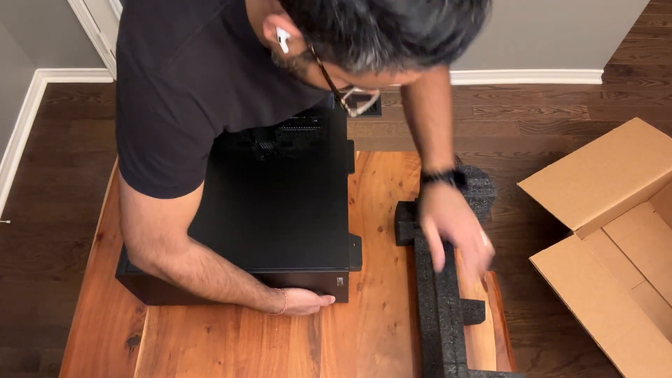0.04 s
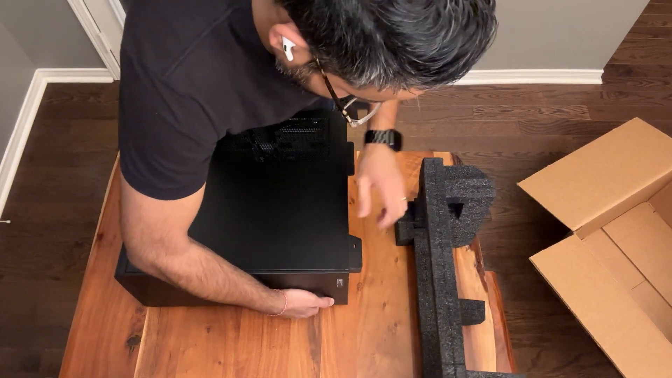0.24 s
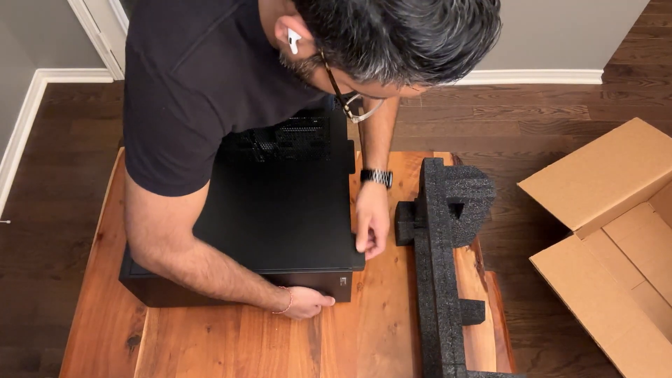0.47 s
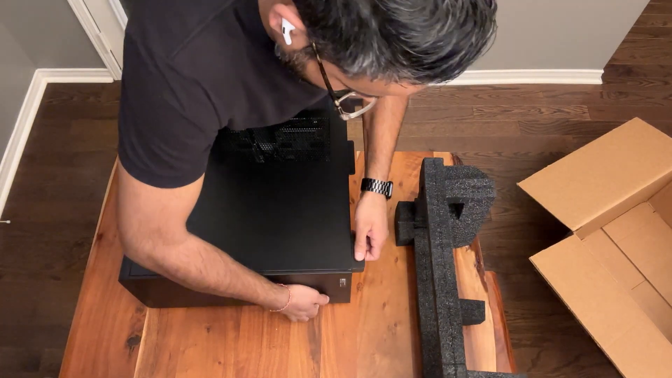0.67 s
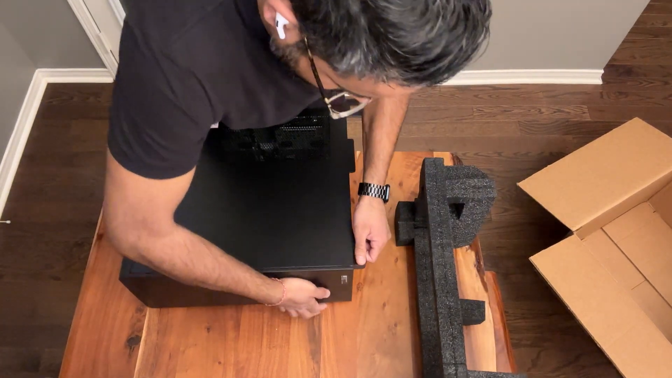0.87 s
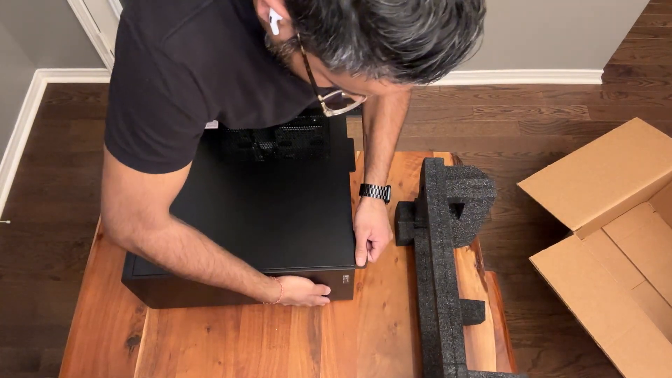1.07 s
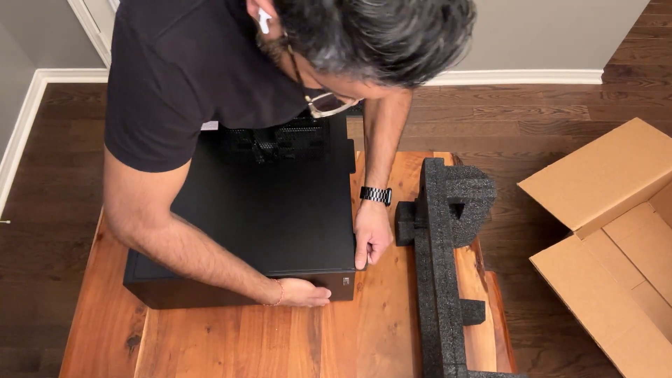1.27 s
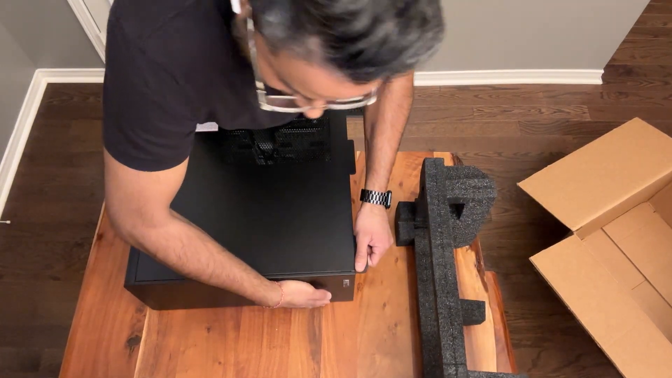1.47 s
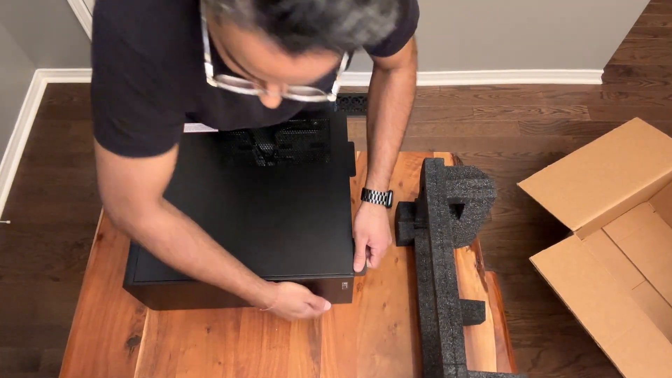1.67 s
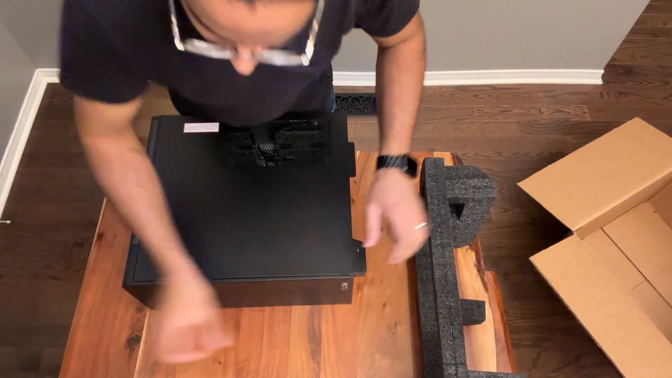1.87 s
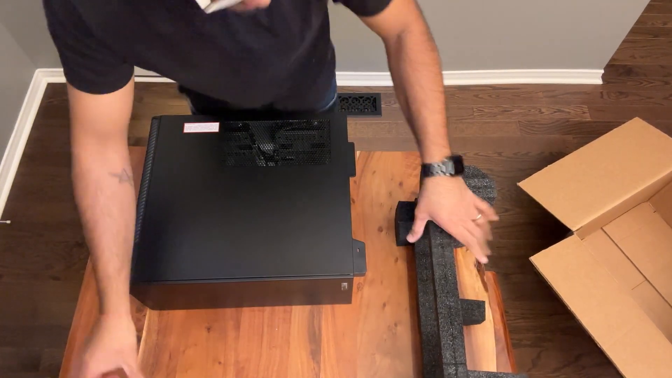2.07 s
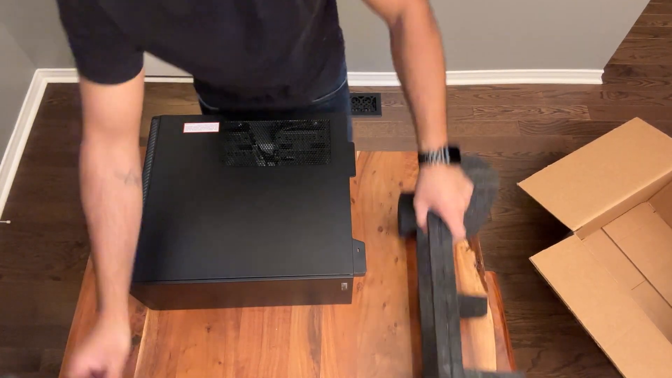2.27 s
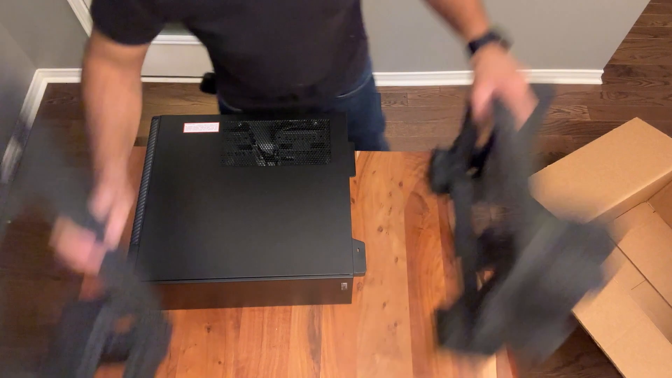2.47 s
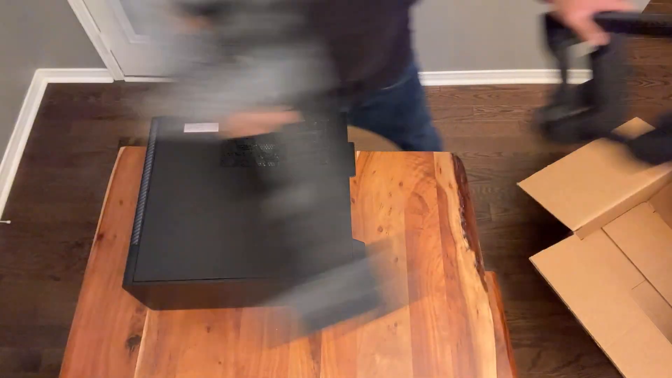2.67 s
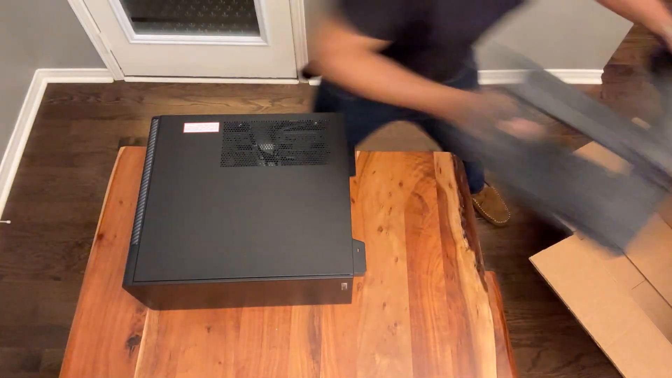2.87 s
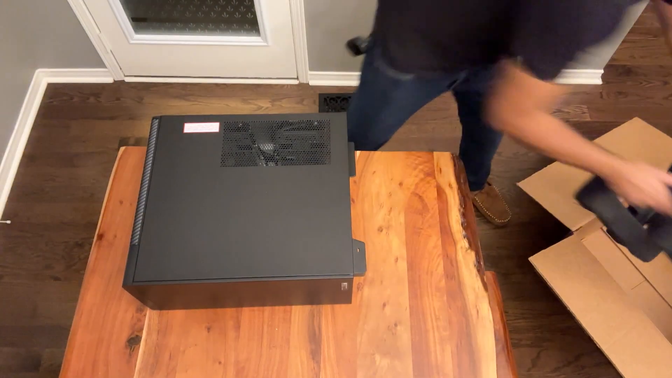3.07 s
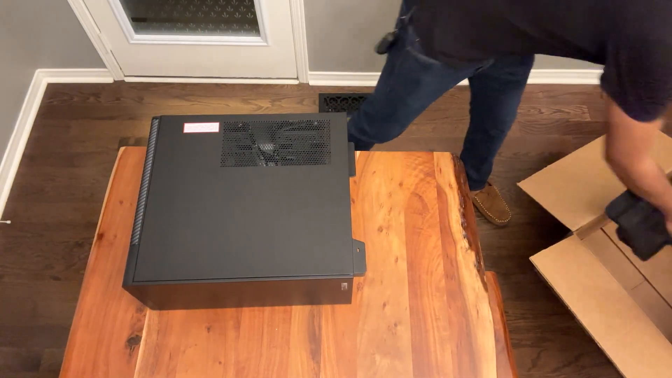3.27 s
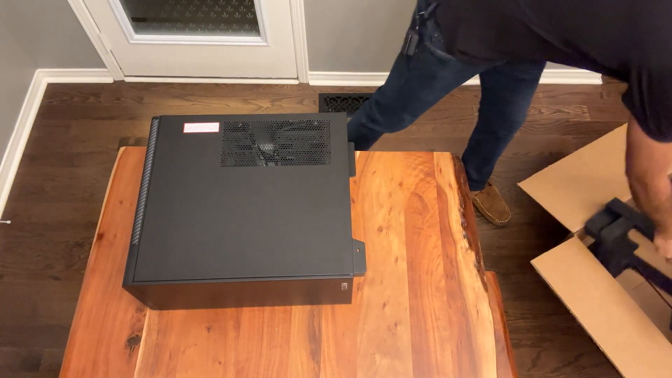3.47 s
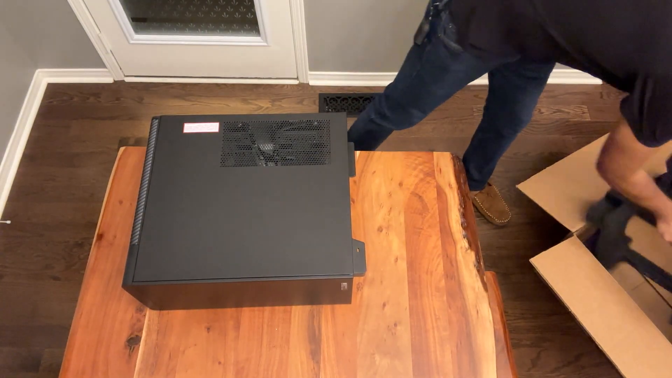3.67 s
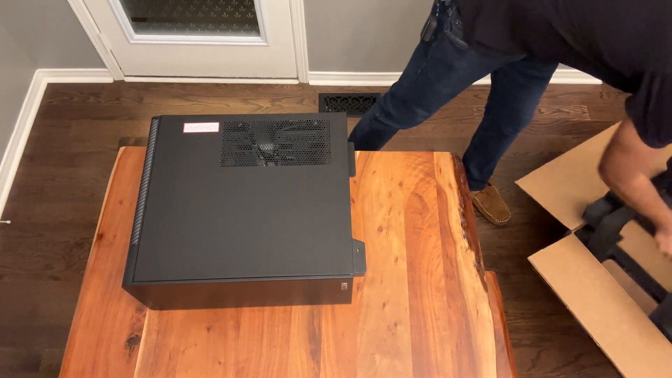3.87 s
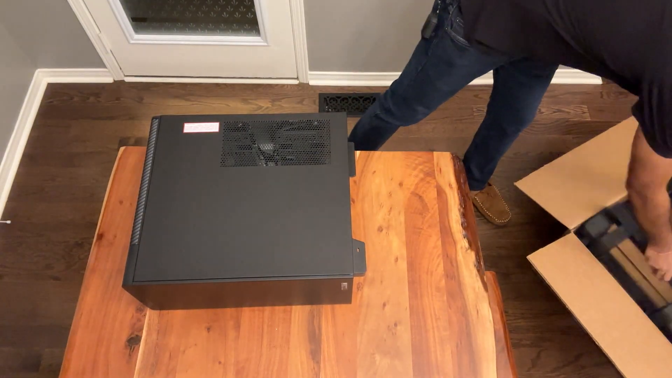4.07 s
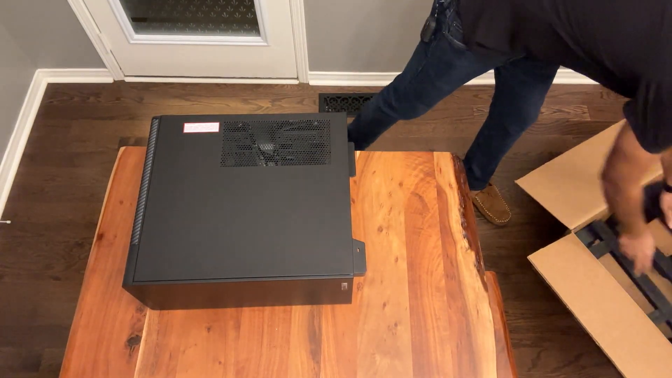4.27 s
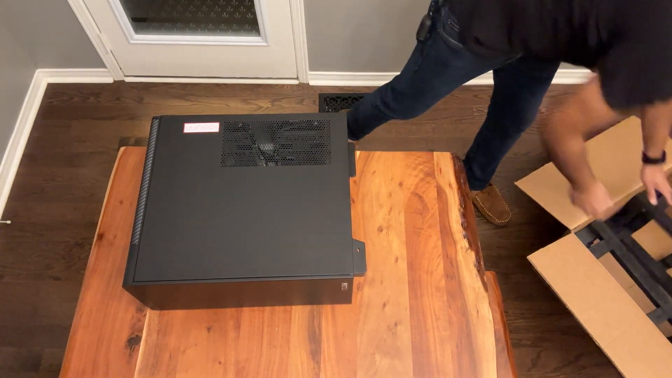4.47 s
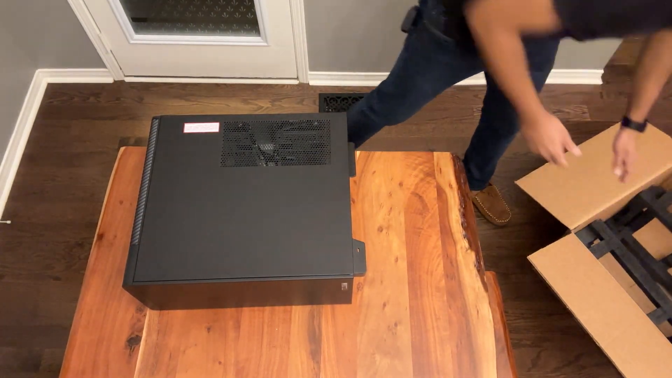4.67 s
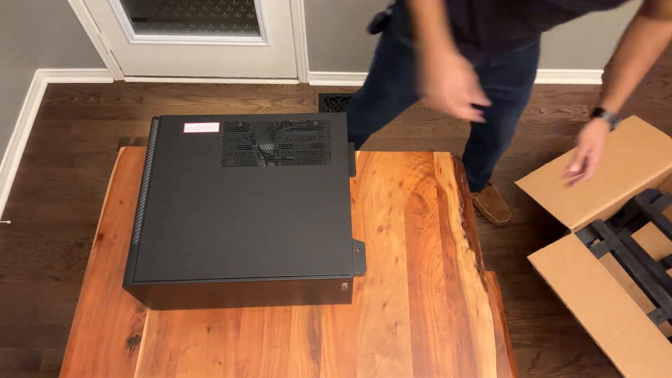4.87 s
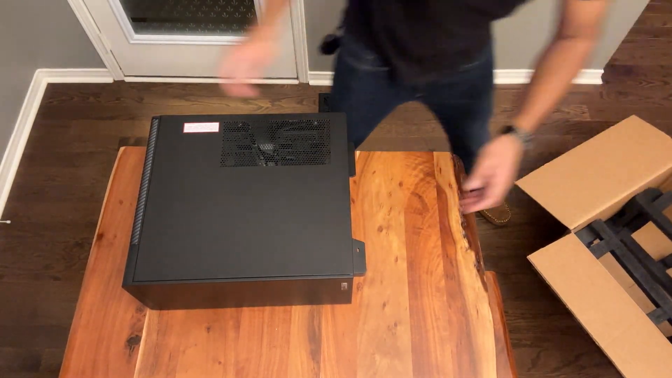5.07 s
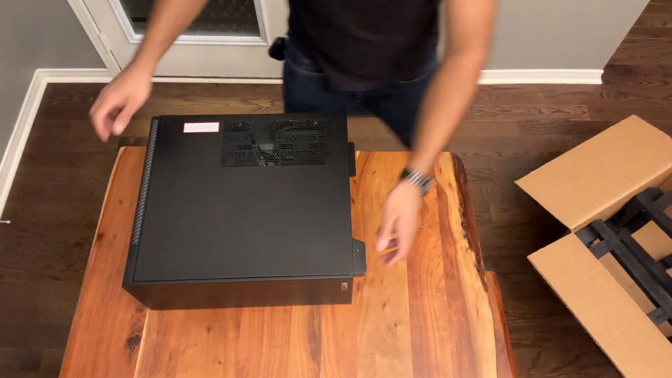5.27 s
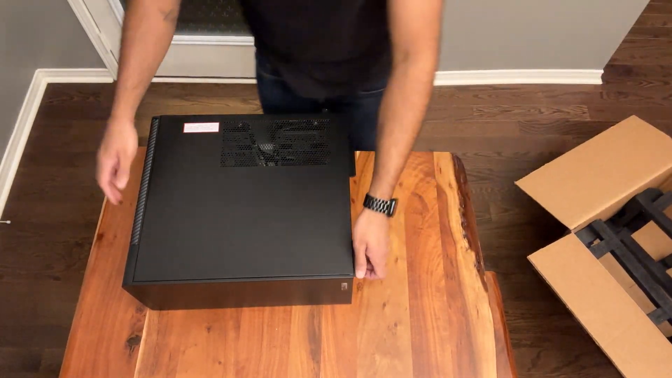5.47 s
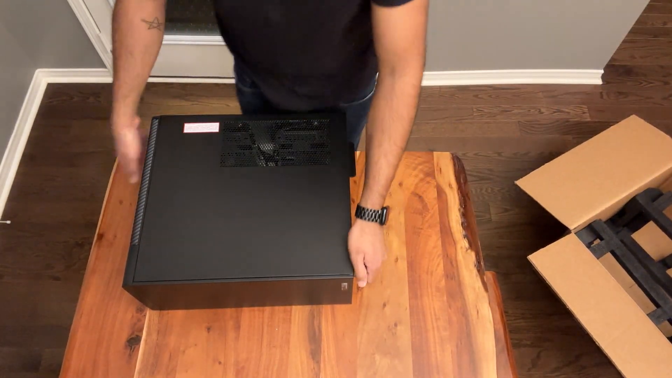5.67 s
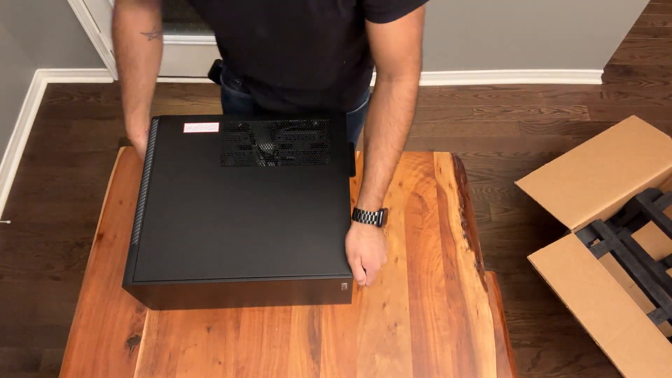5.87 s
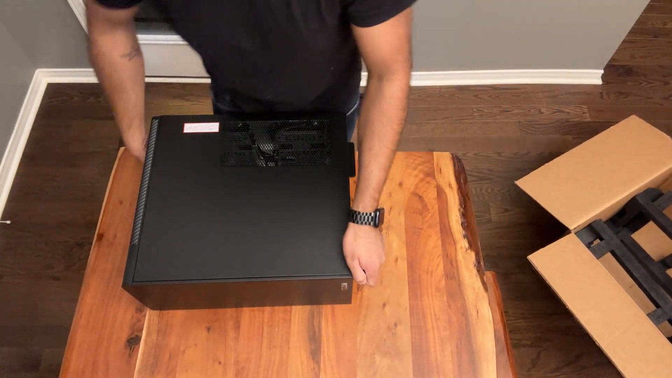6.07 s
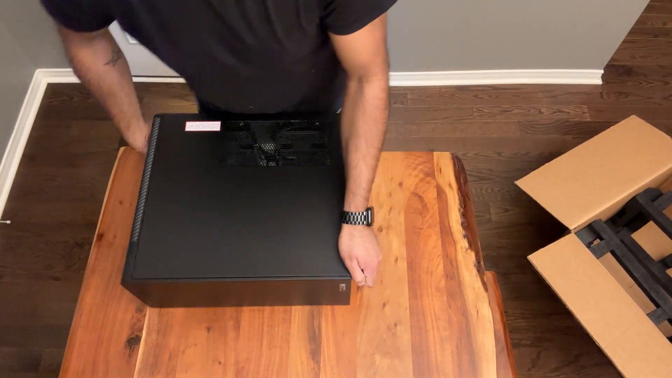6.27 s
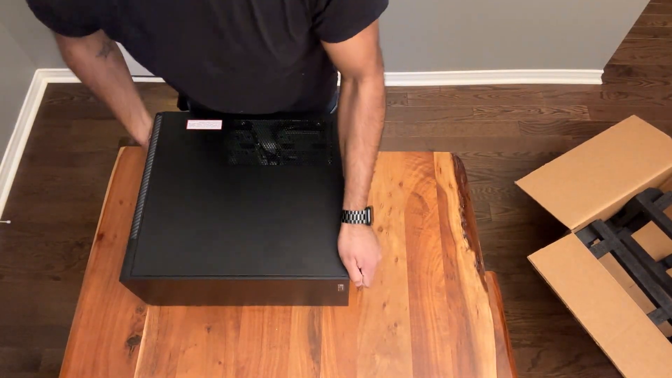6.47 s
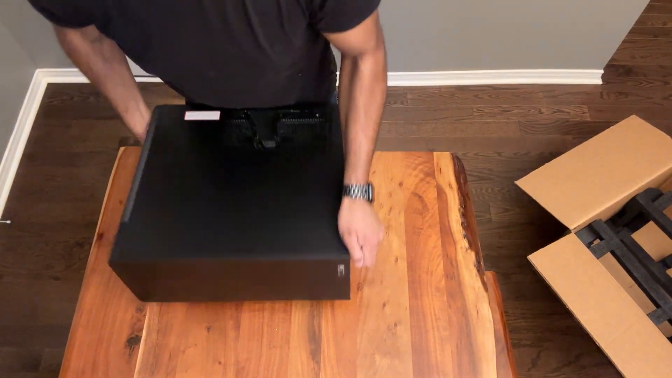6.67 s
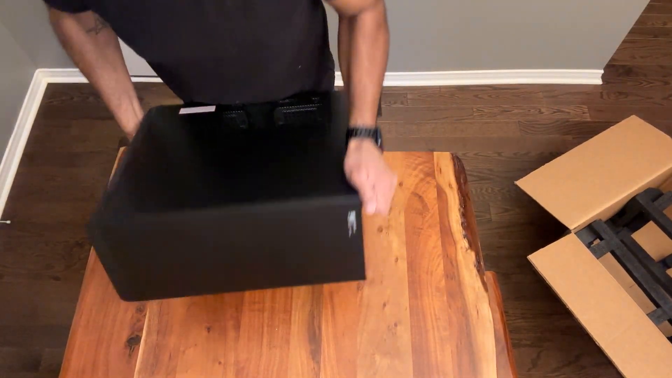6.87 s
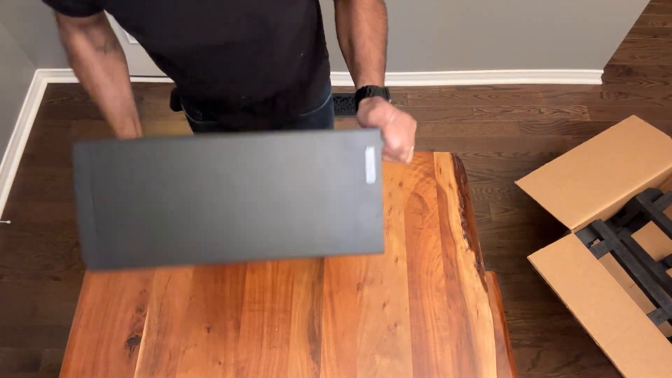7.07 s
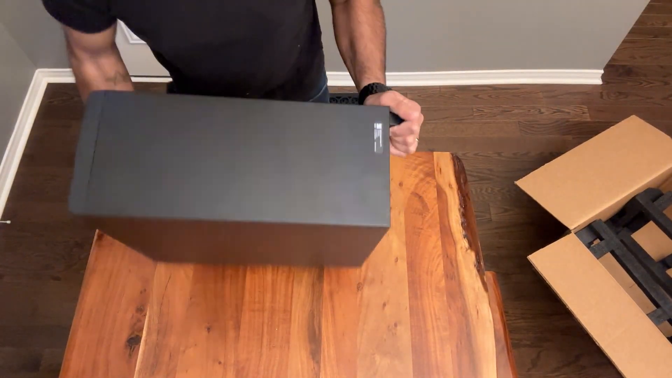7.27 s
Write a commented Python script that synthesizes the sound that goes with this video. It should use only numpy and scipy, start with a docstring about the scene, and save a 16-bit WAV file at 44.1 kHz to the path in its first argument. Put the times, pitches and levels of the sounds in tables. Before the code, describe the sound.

A bare room with a wooden floor, heard closely in stereo with a short lively reverberation and quiet air. At 0.2 s a palm bumps a hollow steel computer case, a low ringing thud; taps and brushes follow, a scrape with a small squeak around 0.9, then thuds at 1.1 and a softer 1.4. It is nearly quiet until foam is picked up with faint rasps from 2.1 to 2.7. At 2.85 a step and a foam knock. From 3.35 to 4.6, on the right, foam is forced into a cardboard box: dense coarse scrapes, sharp crackling rushes at 3.5 and 4.15, tiny squeaks near 3.7-3.9, hollow thumps at 3.7 and 3.9, and the loudest boom at 4.23, with the floor rumbling. Soft rustles, then light footsteps and taps from 5.05 to 6.0. Hands rub the case, knock it at 6.5-6.6, and very faint touches end the scene by 7.3.

```python
"""A bare room with a wooden floor: hands bump, brush and tap a steel computer case close to a microphone pair.
To the right, foam end caps are forced into a cardboard box: they scrape, rasp and thump its walls.
Blows are damped modes and filtered noise bursts; rubbing is a dense train of random little slips.
Squeaks are unsteady tones; steps and shifting weight sound the floor, over the quiet air of the room."""
import sys
import numpy as np
from scipy import signal
from scipy.fft import rfft, irfft, next_fast_len
from scipy.io import wavfile
from scipy.ndimage import uniform_filter1d, map_coordinates

SR = 44100
rng = np.random.default_rng(int(sys.argv[2]) if len(sys.argv) > 2 else 0)


def transcribe(signal):
    """Save signal, clipped to [-1, 1], as a 16-bit WAV file at the path in sys.argv[1]."""
    frames = np.atleast_2d(signal).T
    limited = np.clip(frames, -1, 1)
    pcm = np.round(limited * 32767).astype(np.int16)
    wavfile.write(sys.argv[1], SR, pcm)


N = 323485
TIME = np.arange(N) / SR
AGE = np.arange(SR) / SR  # seconds since a blow or the start of a stroke

# Tone of the low drag, for foam and hands alike. Each row: frequency in Hz, relative level in dB.
DRAG_TONE = [(150, -23.5), (260, 2), (400, 2), (700, -0.5), (1200, -8), (1800, -13.5), (4000, -67.5)]


def amp(db):
    """Decibels to gain."""
    return 10 ** (np.asarray(db) / 20)


def unit(x):
    """Scale to rms 1."""
    return x / np.sqrt(np.mean(x ** 2) + 1e-20)


def loudest(x):
    """Scale a stereo blow so that its loudest 20 ms have rms 1."""
    power = uniform_filter1d(np.mean(x ** 2, axis=0), size=882)
    return x / np.sqrt(power.max() + 1e-20)


def along(points, hz):
    """Read a curve of (Hz, value) points on a log frequency axis."""
    f, v = np.transpose(points)
    return np.interp(np.log(hz + 1), np.log(f), v)


def wobble(rate):
    """A smooth random curve with rate knots a second."""
    return map_coordinates(rng.standard_normal(size=4096), [TIME * rate], mode="wrap")


def colour(x, points):
    """Filter to the given (Hz, dB) shape with minimum phase, so that nothing sounds before the blow."""
    n = x.shape[-1]
    m = 2 * next_fast_len(n // 2 + SR // 8)
    shape_db = along(points, np.fft.rfftfreq(m, 1 / SR))
    cepstrum = irfft(np.log(amp(shape_db)))
    # Folding the cepstrum onto positive time makes the filter causal.
    cepstrum[1:m // 2] *= 2
    cepstrum[m // 2 + 1:] = 0
    return irfft(rfft(x, m) * np.exp(rfft(cepstrum)), m)[..., :n]


def add(track, s, x):
    """Mix x into the track at s seconds."""
    start = max(round(s * SR), 0)
    track[:, start:start + x.shape[-1]] += x[..., :N - start]


def echoes():
    """A fresh stereo room tail of energy 1: sparse wall echoes thicken into a wash; the top treble dies first."""
    # Reverberation of the room. Each row: frequency in Hz, t60 in seconds.
    room_t60 = [(60, 0.69), (250, 0.43), (700, 0.41), (2000, 0.53), (5000, 0.42), (10000, 0.39),
                (15000, 0.12)]
    density = np.clip((AGE / 0.06) ** 2, 1 / 400, 1)
    present = rng.random((2, SR)) < density
    arrivals = rng.standard_normal((2, SR)) * present / np.sqrt(density)
    hz, t, z = signal.stft(arrivals, SR, nperseg=256)
    decay = amp(-60 * t / along(room_t60, hz)[:, None])
    tail = signal.istft(z * decay, SR, nperseg=256)[1][:, :SR]
    onset = 1 - np.exp(-AGE / 0.0047)
    return unit(tail * onset) / np.sqrt(SR)


def contact(t60, wet_db):
    """A short rough contact of energy 1, the same at both microphones, and the room's answer."""
    crack = unit(rng.standard_normal(SR) * amp(-60 * AGE / t60)) / np.sqrt(SR)
    return crack + amp(wet_db) * echoes()


def ring(modes, rise, pitch=1, spread=0.3, waver=0.3):
    """Damped modes; reflections make each waver and reach the two microphones out of step."""
    out = np.zeros((2, SR))
    for hz, db, t60 in modes:
        drift = np.interp(AGE, np.linspace(0, 1, num=50), np.cumsum(rng.standard_normal(size=50)))
        offset = spread * hz / 200 * rng.standard_normal((2, 1))  # one per microphone
        phase = 2 * np.pi * hz * pitch * AGE + waver * drift + offset
        level = amp(db + rng.normal(0, 1) - 60 * AGE / t60)
        out += level * np.sin(phase)
    return loudest(out * (1 - np.exp(-(AGE / rise) ** 2)))


def patchy(x, depth_db):
    """Brief resonances come and go as the contact patch moves."""
    z = signal.stft(x, nperseg=512)[2]
    field = uniform_filter1d(rng.standard_normal(z.shape[1:]), size=3, axis=0)  # over frequency
    field = uniform_filter1d(field, size=5, axis=1)  # over time
    return signal.istft(z * amp(depth_db * unit(field)), nperseg=512)[1][:, :x.shape[-1]]


def strokes(rows, release):
    """A gain per sample for each dB column: a stroke swells over its length, then dies away with t60 release."""
    power = np.zeros((len(rows[0]) - 2, N))
    for s, length, *db in rows:
        swell = np.sin(np.pi / 2 * np.minimum(AGE / length, 1)) ** 0.92
        fade = amp(-60 * np.maximum(AGE - length, 0) / np.reshape(release, (-1, 1)))
        add(power, s, (amp(db)[:, None] * swell * fade) ** 2)
    return np.sqrt(power)


def friction(spectrum, rate, grain_db, wet_db, flutter_db):
    """Dense little slips of uneven size, rate a second on average, heard in the room, rms 1."""
    present = rng.random(N) < rate / SR
    size = amp(grain_db * np.minimum(rng.exponential(size=N), 4))
    slips = present * rng.standard_normal(N) * size
    answer = signal.fftconvolve(slips[None], echoes(), axes=1)[:, :N]
    heard = patchy(slips + amp(wet_db) * answer, depth_db=2.8)
    return unit(colour(heard, spectrum) * amp(flutter_db * wobble(70)))


def rubbing(rows, release, shapes, rate, grain_db, wet_db, flutter_db, groan_db):
    """Sliding contact: low drag, scrape and fine-textured hiss; the drag makes the hollow body groan."""
    # Tone of the groaning hollow body. Each row: frequency in Hz, relative level in dB.
    groan_tone = [(60, -34.5), (105, 1), (145, -3.5), (205, 2), (300, -18), (500, -55)]
    levels = strokes(rows, release)
    pressure = amp(0.85 * wobble(35))  # varies in fits, for all bands together
    slide = np.zeros((2, N))
    for level, shape in zip(levels, shapes):
        slide += level * friction(shape, rate, grain_db, wet_db, flutter_db)
    groan = levels[0] * amp(groan_db) * unit(colour(rng.standard_normal((2, N)), groan_tone))
    return pressure * slide + groan


def box():
    """Foam jams and gives way: one wall booms, the box rings and the cardboard buckles."""
    # Foam thumping the box. Each row: start in seconds, wall level in dB, wall pitch in Hz, ring level in dB,
    # crush level in dB, rise in seconds (the wall takes twice as long).
    thumps = [(3.363, -36.5, 250, -48.5, -48.5, 0.007), (3.716, -38, 853, -51.5, -40, 0.00062),
              (3.725, -28.5, 218.5, -30, -31, 0.0046), (3.768, -37, 105.7, -36.5, -39, 0.0051),
              (3.91, -34, 220, -31.5, -28, 0.0029), (4.233, -16.5, 175.7, -21.5, -17.5, 0.00078),
              (4.252, -33.5, 103.4, -46, -26, 0.0028), (4.414, -55, 188, -32.5, -26, 0.0019),
              (4.53, -42, 137.4, -51, -43, 0.0073)]
    # Modes of the cardboard box. Each row: frequency in Hz, relative level in dB, t60 in seconds.
    box_modes = [(55.66, 0.5, 1), (106.9, 5, 0.66), (203.5, 1.5, 0.75), (243.2, 8, 0.35), (398.4, 8, 0.4),
                 (451, -15.5, 0.28), (493, 3.5, 0.59), (560, -17.5, 0.09), (626, -14, 0.17), (756, -5, 0.1),
                 (788, 5, 0.19), (837, -27, .35)]
    # Tone of buckling cardboard. Each row: frequency in Hz, relative level in dB.
    crush_tone = [(25, -11.5), (55, -15.5), (120, -6), (220, 1.5), (310, -8), (420, -1), (600, -6.5),
                  (900, -13), (1250, -21.5), (2000, -28), (5000, -62.5)]
    out = np.zeros((2, N))
    for s, wall_db, wall_hz, ring_db, crush_db, rise in thumps:
        wall = ring([(wall_hz, 0, 0.3)], 2 * rise, spread=0.65, waver=0.13)
        whole = ring(box_modes, rise, spread=0.63, waver=0.96)
        buckle = colour(contact(t60=0.15, wet_db=0.5), crush_tone) * (1 - np.exp(-AGE / rise))
        add(out, s, amp(wall_db) * wall)
        add(out, s, amp(ring_db) * whole)
        add(out, s, amp(crush_db) * loudest(buckle))
    return out


def foam():
    """Foam caps are picked up, then shoved into the box: coarse slips, and the hollow box groans."""
    # Each row: start in seconds, length in seconds, drag level in dB, scrape level in dB, hiss level in dB.
    foam_strokes = [(2.11, 0.17, -55, -53.5, -57.5), (2.25, 0.013, -55.5, -51.5, -53),
                    (2.41, 0.083, -63, -56, -58.5), (2.52, 0.14, -74, -69, -67),
                    (2.66, 0.14, -69.5, -62.5, -63.5), (2.83, 0.09, -43, -57, -62),
                    (2.93, 0.095, -60, -58.5, -65), (3.08, 0.31, -75, -69, -72),
                    (3.365, 0.097, -42, -40.5, -48), (3.47, 0.025, -38.5, -55, -55),
                    (3.56, .13, -47.5, -39.5, -43.5), (3.72, 0.065, -41, -44, -53.5),
                    (3.915, 0.12, -41, -39, -43.5), (4.02, 0.098, -41, -38, -43),
                    (4.14, 0.11, -34.5, -32.5, -40.5), (4.25, 0.057, -32.5, -39.5, -44),
                    (4.38, 0.074, -36, -40, -46), (4.48, 0.024, -41, -54, -65.5)]
    # Tones of the scrape and the hiss. Each row: frequency in Hz, relative level in dB.
    scrape_tone = [(600, -35), (1150, -3.5), (2000, -2.5), (3200, -3.5), (4500, -5), (6000, -6),
                   (7500, -15.5), (10000, -39.5)]
    hiss_tone = [(4500, -43), (7000, -12), (8500, -0.5), (10000, -3.5), (11500, -7), (14000, -10.5),
                 (15500, -42.5)]
    release = (0.48, 0.55, 0.44)  # t60 in s of drag, scrape and hiss after letting go
    return rubbing(foam_strokes, release, (DRAG_TONE, scrape_tone, hiss_tone), rate=2200,
                   grain_db=2.5, wet_db=4, flutter_db=1.04, groan_db=-1.5)


def rasps():
    """Jammed foam lets go in a sudden crackling rush."""
    # Foam catching and breaking loose. Each row: start in seconds, level in dB, t60 in seconds,
    # treble tilt in dB reached at 8 kHz.
    rushes = [(2.845, -61, 0.87, -37.5), (3.35, -53, 0.073, -24.5), (3.374, -47, 0.22, -2.5),
              (3.487, -31.5, 0.085, 3.5), (3.817, -45.5, 0.045, 4), (3.892, -40, 0.24, -5.5),
              (4.162, -34.5, 0.51, 3), (4.386, -35, 0.4, 6.5)]
    rasp_tone = [(600, -18), (1800, -10.0), (3200, 0.5), (5500, -3.5), (7500, -7.0), (10000, -5.0),
                 (12000, -11.0), (15000, -10.0)]  # (Hz, dB)
    out = np.zeros((2, N))
    for s, db, t60, tilt_db in rushes:
        rush = patchy(contact(t60, wet_db=1.5), depth_db=4)
        rush = colour(rush, rasp_tone)
        rush = colour(rush, [(1500, 0), (8000, tilt_db)])
        add(out, s, amp(db) * loudest(rush))
    return out


def from_right(x, shade_db):
    """The box stands to the right: its sound reaches the left microphone later and weaker."""
    left = amp(-shade_db) * np.roll(x[0], 13)  # 13 samples, about 0.3 ms
    return np.array([left, amp(shade_db) * x[1]])


def case():
    """A bump rings the side panel and rattles it faintly; a slow press reaches only the low modes."""
    # Bumps on the case. Each row: start in seconds, panel level in dB, thud level in dB, rattle level in dB,
    # panel pitch ratio, rise in seconds.
    bumps = [(.232, -29, -31.5, -59, 1, 0.01), (1.099, -29.5, -29, -67.5, 0.98, 0.0028),
             (1.381, -32.5, -36, -57.5, .94, 0.0089), (6.529, -47, -53, -73, 1.03, 0.024),
             (6.87, -58, -71, -90, 1.03, 0.011), (7.022, -58, -65, -94, 1.2, 0.0059),
             (7.11, -61, -68, -77, 1.03, .008), (7.215, -58.5, -62, -84, 1.07, .009)]
    # Modes of the steel side panel. Each row: frequency in Hz, relative level in dB, t60 in seconds.
    panel_modes = [(52.5, -11, 0.96), (84.6, -11, 0.68), (181.4, 6, 0.45), (227, -21, 0.4),
                   (279, 3.5, 0.26), (379, -2.5, 0.33), (449.5, -10.5, 0.15), (564, -5.5, 0.33),
                   (624, -32, 0.43), (786, -9.5, 0.28), (894, -42, 0.18)]
    # Tone of a palm on the panel. Each row: frequency in Hz, relative level in dB.
    thud_tone = [(40, -13.5), (120, 0), (200, 7.5), (380, -0.5), (600, -7), (900, -16.5), (1400, -29),
                 (3000, -88.5)]
    rattle_tone = [(500, -18), (1500, 7.5), (4500, -1.5), (7000, -13), (10000, -10.5), (14000, -32)]  # (Hz, dB)
    out = np.zeros((2, N))
    for s, db, thud_db, rattle_db, pitch, rise in bumps:
        swell = 1 - np.exp(-(AGE / rise) ** 2)
        # The slower the press, the more the modes above 190 Hz are weakened.
        reached = [(hz, level - 1.6 * rise * max(hz - 190, 0), t60) for hz, level, t60 in panel_modes]
        panel = ring(reached, rise, pitch, spread=0.14, waver=0.2)
        thud = colour(contact(t60=0.14, wet_db=0), thud_tone)
        rattle = colour(patchy(contact(t60=0.29, wet_db=-3), depth_db=1), rattle_tone)
        add(out, s, amp(db) * panel)
        add(out, s, amp(thud_db) * loudest(thud * swell) + amp(rattle_db) * loudest(rattle * swell))
    return out


def hands():
    """Hands brush the case and clothes rustle: denser slips of more even size, and the hollow case groans."""
    # Each row: start in seconds, length in seconds, drag level in dB, scrape level in dB, hiss level in dB.
    hand_strokes = [(0, 0.027, -54.5, -61, -70), (.44, 0.065, -54, -66, -63),
                    (.56, 0.083, -58, -56.5, -57.5), (.66, 0.076, -57, -62, -66.5),
                    (.832, 0.12, -53, -48, -49.5), (1.35, 0.063, -61.5, -64.5, -86),
                    (4.66, 0.16, -57.5, -57.5, -68.5), (4.86, 0.095, -58, -59, -68.5),
                    (5.11, 0.029, -50, -57, -66), (5.19, 0.072, -97, -67.5, -71),
                    (5.3, 0.15, -70, -71, -83), (5.58, 0.072, -52.5, -55.5, -71),
                    (5.69, 0.013, -46, -47.5, -77), (5.77, 0.033, -47.5, -55, -71),
                    (5.84, 0.072, -56.5, -61, -62), (6.0, 0.082, -50.5, -50.5, -66),
                    (6.15, 0.15, -60, -62.5, -66), (6.32, 0.064, -59.5, -67.5, -81),
                    (6.48, 0.078, -58, -66, -73), (6.64, 0.025, -64, -57, -85), (6.74, 0.13, -65, -86, -81),
                    (7.09, 0.11, -67.5, -74, -81.5)]
    # Tones of the scrape and the hiss. Each row: frequency in Hz, relative level in dB.
    scrape_tone = [(600, -17.5), (1300, -0.5), (1900, 0), (3000, -2), (4200, -6), (5500, -7.5), (7500, -14),
                   (10000, -26.5)]
    hiss_tone = [(4500, -14.5), (6800, -11), (8500, -3.5), (10000, -4), (11300, -11.5), (14000, -13),
                 (15500, -55)]
    release = (0.66, 0.47, 0.27)  # t60 in s of drag, scrape and hiss after letting go
    return rubbing(hand_strokes, release, (DRAG_TONE, scrape_tone, hiss_tone), rate=3000,
                   grain_db=2.0, wet_db=0.5, flutter_db=-0.13, groan_db=-1)


def taps():
    """Each hard touch is a dull knock, a clack that rings the touched spot, and a fine tick."""
    # Taps of fingers and foam. Each row: start in seconds, knock level in dB, clack level in dB,
    # tick level in dB, pitch of the touched spot in Hz, its ring relative to the clack in dB.
    touches = [(0.333, -51, -81, -66.5, 1030, -3), (.492, -39.5, -53, -53.5, 934, -1.5),
               (1.993, -75, -86, -72, 1510, 7), (2.107, -70, -67, -76, 1280, -6),
               (2.139, -69, -80, -63.5, 1550, -3), (2.839, -48, -46.5, -73, 1800, -9),
               (5.044, -45, -53.5, -66, 2210, -12), (5.114, -47.5, -50.5, -66, 1090, -4),
               (5.494, -55, -61, -82, 1250, -4), (5.55, -55.5, -59.5, -61.5, 1410, -4),
               (5.603, -48, -47, -53, 953, -1.5), (5.696, -46.5, -50.5, -59, 1080, -10),
               (5.788, -40, -47.5, -56, 1273, -5), (6.013, -45.5, -44.5, -48, 1060, -9),
               (6.515, -61, -62, -72, 1187, 0), (6.629, -40, -41, -53.5, 1136, -7.5),
               (6.796, -72, -61, -70.5, 1104, -1), (6.897, -54.5, -60, -82, 1049, 9.5),
               (7.108, -61, -70, -73, 1495, 4)]
    # Modes of a touched spot. Each row: pitch ratio, relative level in dB, t60 in seconds.
    spot_modes = [(1, 7, 0.13), (1.17, 3, 0.11), (1.68, -13, 0.4), (2.3, -14, 0.16), (3.6, -4.5, 0.061)]
    # Tones of the three parts as (Hz, dB).
    knock_tone = [(80, -23.5), (220, 0.0), (400, -1), (700, -7), (1200, -36), (3000, -58)]
    clack_tone = [(350, -33.5), (900, 7.5), (1500, 1.5), (3000, -2.5), (4500, -7.5), (8000, -28.5)]
    tick_tone = [(2500, -18.5), (5000, -3), (7500, -3.5), (10000, -3.5), (12000, -23), (15000, -25.5)]
    out = np.zeros((2, N))
    for s, knock_db, clack_db, tick_db, hz, ring_db in touches:
        knock = colour(patchy(contact(t60=0.079, wet_db=4.5), depth_db=2.5), knock_tone)
        clack = colour(patchy(contact(t60=0.016, wet_db=5), depth_db=1.5), clack_tone)
        tick = colour(contact(t60=0.016, wet_db=3), tick_tone)
        spot = amp(ring_db) * ring(spot_modes, rise=0.001, pitch=hz, spread=0.5, waver=1.4)
        add(out, s, amp(knock_db) * loudest(knock) + amp(tick_db) * loudest(tick))
        add(out, s, amp(clack_db) * (loudest(clack) + spot))
    return out


def squeaks():
    """Where a surface sticks and slips evenly it briefly finds an unsteady pitch."""
    # Each row: time of the peak in seconds, pitch in Hz, level in dB,
    # time from the peak to 1/e of its height in seconds.
    chirps = [(0.931, 1776, -56.5, 0.043), (0.943, 1960, -49, .014), (0.911, 5600, -50.5, 0.031),
              (3.681, 2820, -46.5, 0.0069), (3.757, 3420, -44, 0.0057), (3.793, 2555, -48, 0.025),
              (3.898, 3030, -44, 0.016)]
    out = np.zeros((2, N))
    t = AGE[:SR // 4] - 1 / 8  # seconds from the peak
    for s, hz, db, length in chirps:
        jitter = 0.075 * hz / 3000 * unit(uniform_filter1d(rng.standard_normal(len(t)), size=50))
        phase = 2 * np.pi * np.cumsum(hz * (1 + jitter)) / SR
        tone = np.sin(phase) * np.exp(-(t / length) ** 2)
        answer = signal.fftconvolve(tone[None], echoes(), axes=1)
        heard = np.pad(tone, (0, SR - 1)) + amp(-6.5) * answer
        add(out, s + t[0], amp(db) * loudest(heard))
    return out


def floor():
    """Steps knock on the boards and make the room boom; shifting weight makes the floor rumble."""
    # Footfalls and shifts of weight. Each row: start in seconds, knock level in dB, boom level in dB,
    # rise in seconds (the boom takes three times as long).
    steps = [(0.069, -67, -51.5, 0.0099), (2.873, -35, -45.5, 0.01), (3.391, -41.5, -42.5, 0.0094),
             (5.059, -46.5, -54, 0.0074), (5.141, -49.5, -51, 0.0051), (5.611, -41.5, -55, 0.0054),
             (5.704, -43.5, -63, 0.0092), (6.016, -43.5, -49.5, 0.0082)]
    # Modes of the wooden floor, then the lowest modes of the room.
    # Each row: frequency in Hz, relative level in dB, t60 in seconds.
    board_modes = [(104.2, -1.5, 0.32), (119.2, -1.5, 0.18), (148.4, -8, 0.58)]
    boom_modes = [(58, 1, 1), (69.8, -11.5, 0.47)]
    # Weight shifting on the floor. Each row: start in seconds, length in seconds, rumble level in dB.
    shifts = [(.07, 0.041, -53.5), (.24, 0.07, -43), (.58, .07, -49), (.72, 0.045, -51.5),
              (1.12, 0.091, -50.5), (1.38, 0.066, -45.5), (1.68, 0.049, -49.5), (2.15, .15, -57.5),
              (2.9, 0.14, -46), (3.36, 0.059, -34), (3.71, 0.12, -34), (3.86, 0.33, -37.5),
              (4.18, 0.066, -39.5), (4.44, 0.036, -38.5), (4.7, 0.047, -56), (5.2, .12, -52),
              (5.42, 0.13, -54), (5.68, 0.096, -48), (6.03, 0.14, -56), (6.28, .08, -65)]
    # Tone of the rumble. Each row: frequency in Hz, relative level in dB.
    rumble_tone = [(15, -25), (28, -15), (45, -8.5), (58, 0), (75, -3.5), (110, -26), (200, -65)]
    rumble = unit(colour(rng.standard_normal((2, N)), rumble_tone))
    out = strokes(shifts, release=0.81) * rumble
    for s, knock_db, boom_db, rise in steps:
        add(out, s, amp(knock_db) * ring(board_modes, rise, spread=0.67, waver=0.73))
        add(out, s, amp(boom_db) * ring(boom_modes, 3 * rise, spread=0.3, waver=0.24))
    return out


def air():
    """The quiet air of the room: steady noise, independent at the two microphones and weak in the treble."""
    # Tone of the air. Each row: frequency in Hz, relative level in dB.
    air_tone = [(15, -30), (30, -4), (65, 4), (280, -6), (700, -13), (1500, -21), (4000, -30), (7500, -37),
                (10000, -35), (12000, -46), (15500, -66)]
    return amp(-69) * unit(colour(rng.standard_normal((2, N)), air_tone))


def scene():
    """All the handling over the quiet air of the room."""
    packing = from_right(box() + foam() + rasps(), shade_db=1.0)
    handling = (hands() + taps() + squeaks()) * amp([[-0.3], [0.3]])  # leans slightly right
    return packing + case() + handling + floor() + air()


def record(dry):
    """Close microphones: bass and top treble are nearly mono, and the treble leads on the left."""
    # Width of the microphone pair. Each row: frequency in Hz, gain of the side signal in dB.
    width = [(50, -13.5), (130, -9.5), (260, -6.5), (500, -0.5), (6000, 1.5), (8000, 1.5), (15000, -42)]
    m = next_fast_len(N + SR // 4)
    hz = np.fft.rfftfreq(m, 1 / SR)
    left, right = rfft(dry, m)
    mid = (left + right) / 2
    side = (left - right) / 2 * amp(along(width, hz))
    lead_samples = along([(6000, 0), (7500, 4)], hz)  # left ahead of right
    turns = along([(6000, 0), (7500, 1)], hz)  # whole turn between the sides, taken back across the crossover
    lead = np.exp(1j * np.pi * (hz / SR * lead_samples - turns))  # half the shift on each side
    pair = np.array([(mid + side) * lead, (mid - side) / lead])
    return irfft(pair * (hz < 15600), m)[:, :N]  # nothing passes above 15.6 kHz


dry = scene()
out = record(dry)
transcribe(out)
```